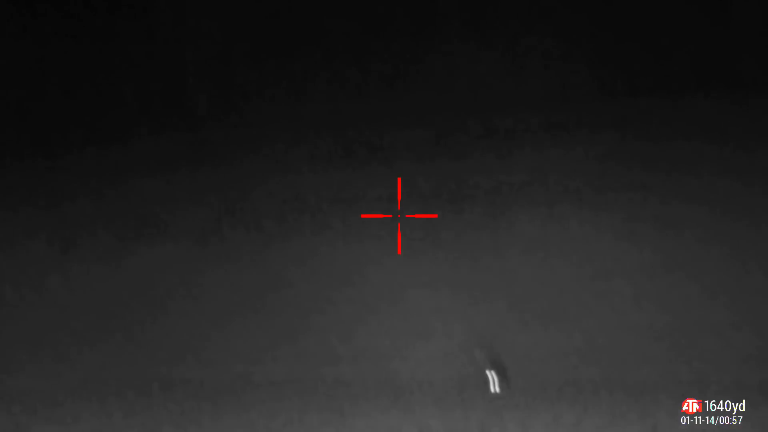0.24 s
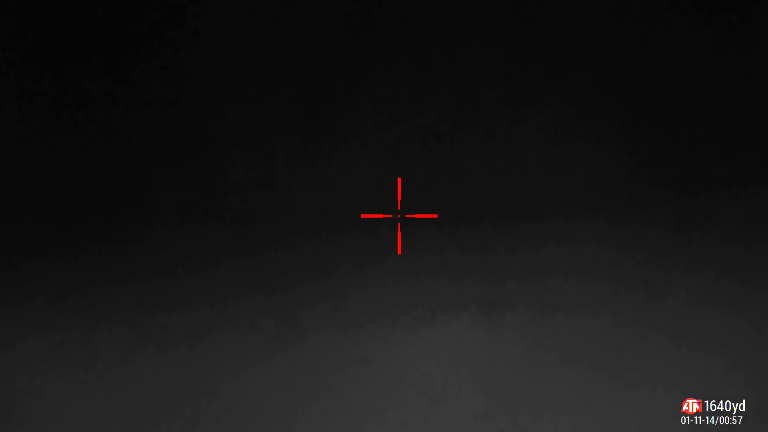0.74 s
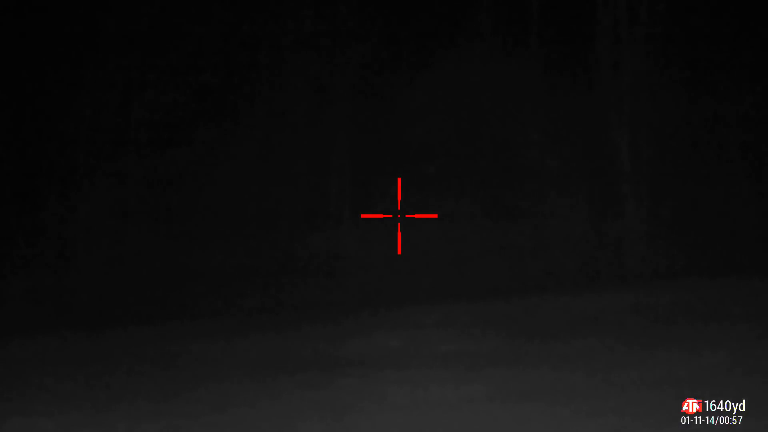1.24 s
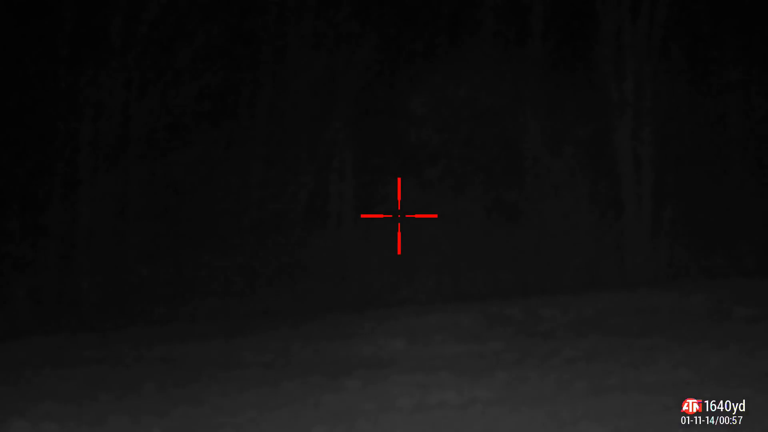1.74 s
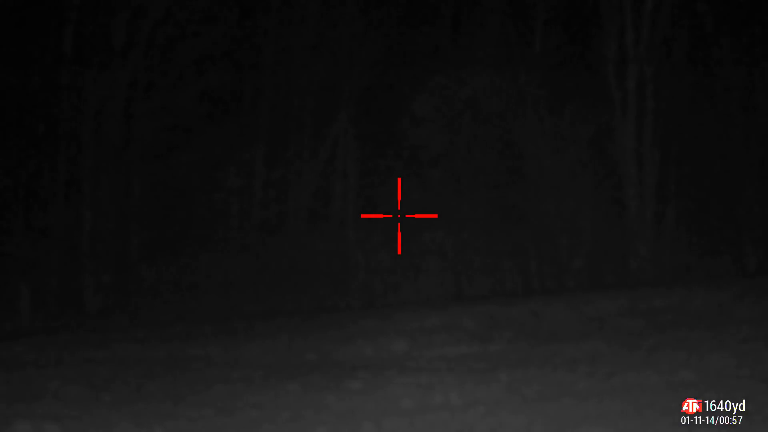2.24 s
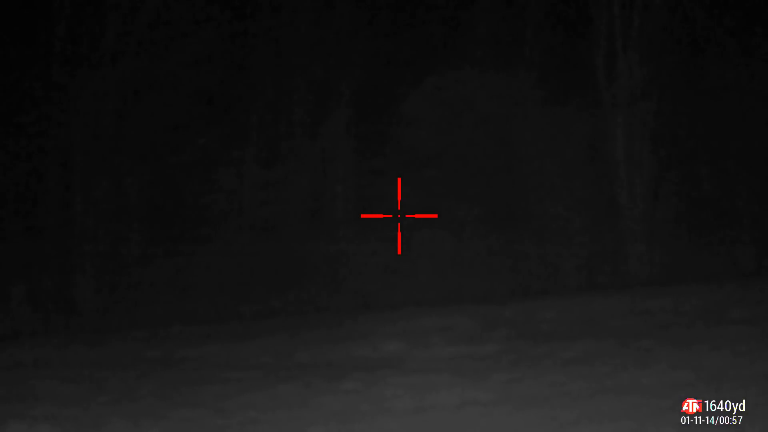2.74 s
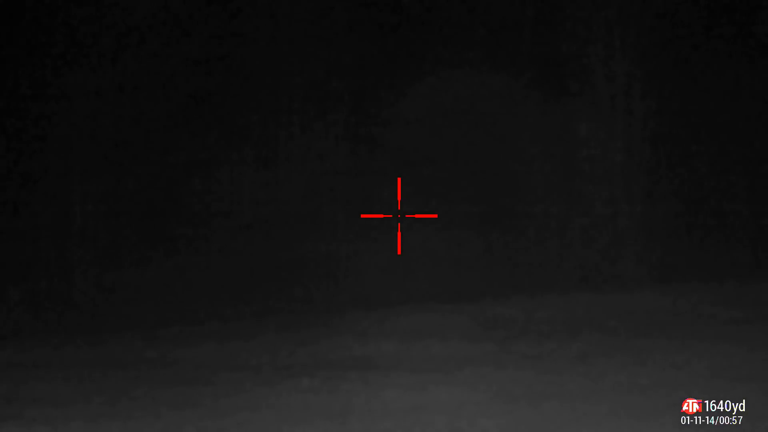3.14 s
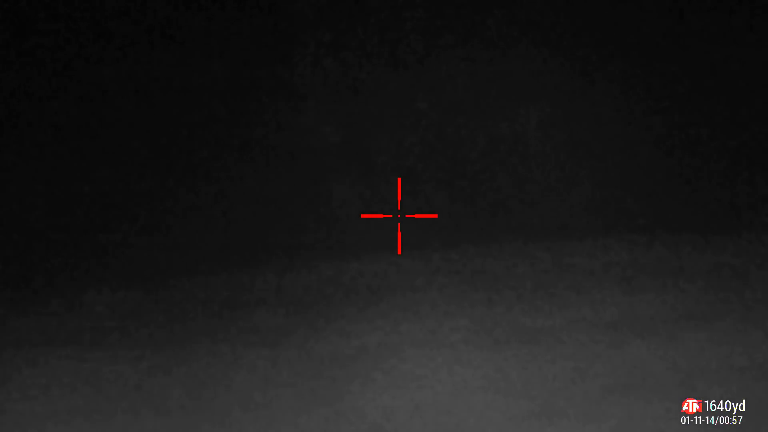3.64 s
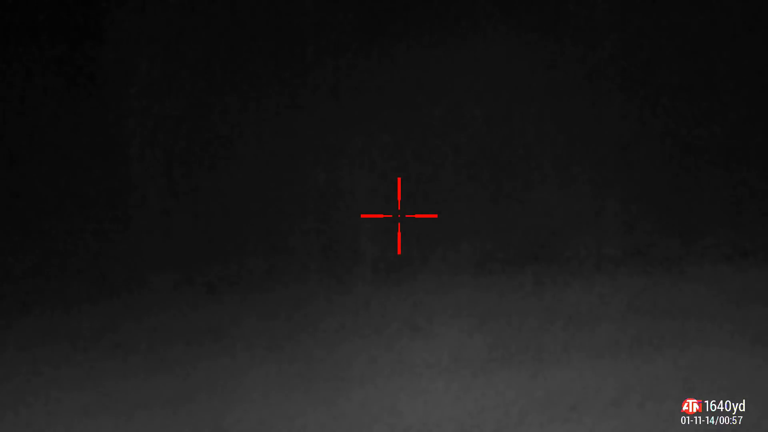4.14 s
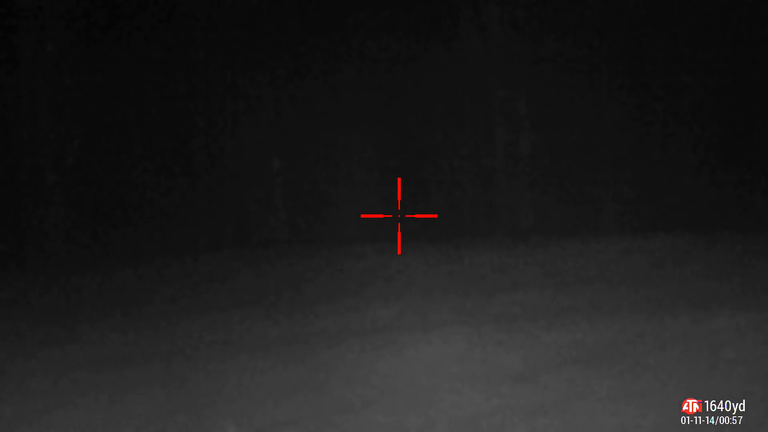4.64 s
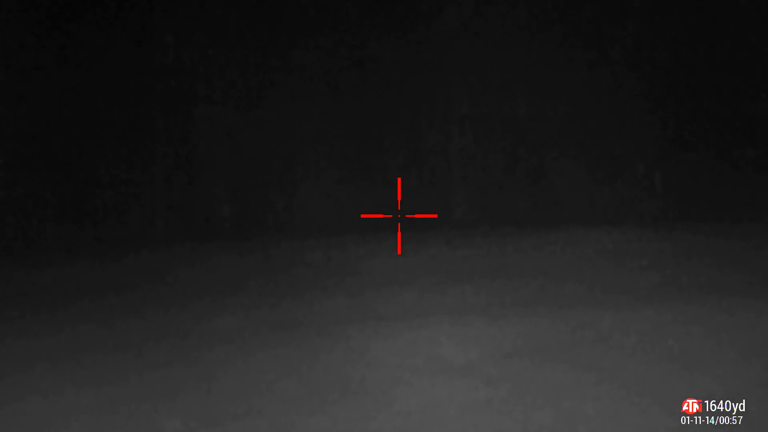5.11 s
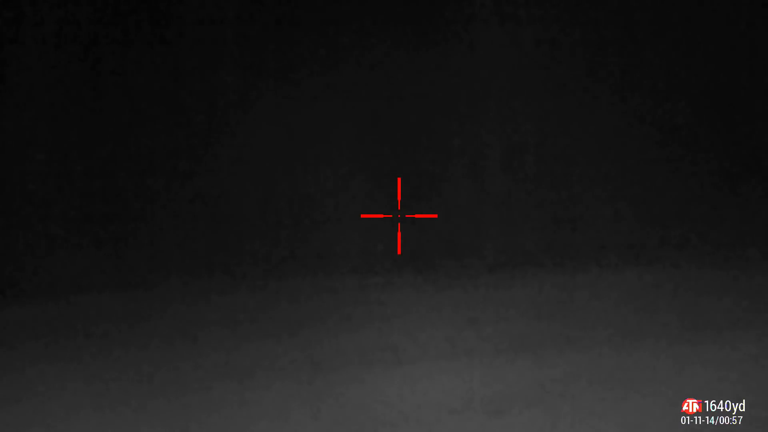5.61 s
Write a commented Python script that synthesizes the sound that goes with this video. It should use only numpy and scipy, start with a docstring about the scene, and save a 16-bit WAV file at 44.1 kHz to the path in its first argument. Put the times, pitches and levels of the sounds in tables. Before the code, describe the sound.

Quiet night air outdoors, with low soft noise, faint microphone hiss and a barely audible wavering whine throughout. A hand-squeezed reed call, close and much louder than everything else, starts immediately with a short nasal squeak. Ten more follow at about 0.4, 0.8, 1.3, 1.7, 2.1, 2.5, 3.3, 3.7, 4.4 and 4.9 seconds. Each lasts roughly a tenth to a fifth of a second, sliding up and back down around 1 to 1.6 kilohertz, bright and buzzy, the stronger ones flipping abruptly at the top. A close dull echo makes them flutter; a very faint tail returns from distant trees. Air hisses into the call around 0.15 seconds. Cloth swishes softly in uneven strokes throughout. Dull gear bumps fall near 1.5, 3.5, 4.0 and 4.8 seconds; tiny ticks come around 5.2, then a cluster of soft knocks at 5.3 to 5.6, before rustling fades into quiet air.

```python
"""Quiet night air, microphone hiss and a faint whine run throughout, as shaped noise and a wavering sine.
From the start a hand-squeezed reed call gives eleven mouse squeaks, harmonics gliding up and down with the squeeze.
A nearby wall throws every squeak back as a short dull echo, and a distant wood answers as a faint noise tail.
After the first squeak air hisses back into the call; then clothing rustles in strokes of shaped noise.
Later, as the scope is swung, the gear bumps (decaying sines with thuds) and ticks (short noise cracks)."""
import sys
import numpy as np
from scipy import signal
from scipy.fft import rfft, irfft, next_fast_len
from scipy.io import wavfile
from scipy.ndimage import uniform_filter1d, map_coordinates

SR = 44100
rng = np.random.default_rng(int(sys.argv[2]) if len(sys.argv) > 2 else 0)


def transcribe(signal):
    """Save signal, clipped to [-1, 1], as a 16-bit WAV file at the path in sys.argv[1]."""
    frames = np.atleast_2d(signal).T
    limited = np.clip(frames, -1, 1)
    pcm = np.round(limited * 32767).astype(np.int16)
    wavfile.write(sys.argv[1], SR, pcm)


N = 258867


def amp(db):
    """Decibels to gain."""
    return 10 ** (np.asarray(db) / 20)


def unit(x):
    """x at rms 1."""
    return x / np.sqrt(np.mean(x ** 2) + 1e-20)


def along(points, hz):
    """A curve of (frequency, value) points read on a log frequency axis."""
    point_hz, value = np.transpose(points)
    return np.interp(np.log(hz + 1), np.log(point_hz), value)


def wobble(rate, size):
    """A smooth random curve through normal random knots, rate knots a second."""
    knots = rng.standard_normal(int(size * rate / SR) + 4)
    return map_coordinates(knots, [np.arange(size) * rate / SR])


def filtered(x, response):
    """x times a complex response of frequency, padded so that tails do not wrap round."""
    size = 2 * next_fast_len(N // 2 + 8192)
    hz = np.fft.rfftfreq(size, 1 / SR)
    return irfft(rfft(x, size) * response(hz), size)[:N]


def resonate(x, points):
    """x through a body with this spectrum, ringing only after it is driven (minimum phase)."""
    def causal(hz):
        cepstrum = irfft(np.log(amp(along(points, hz))))
        half = len(cepstrum) // 2
        fold = np.r_[1, np.full(half - 1, 2), np.zeros(half)]
        return np.exp(rfft(cepstrum * fold))
    return filtered(x, causal)


def noise(points):
    """Coloured noise of rms 1."""
    white = rng.standard_normal(N)
    return unit(filtered(white, lambda hz: amp(along(points, hz))))


def reverb(x, decay, delay):
    """A diffuse tail, delay seconds late, in which each frequency dies at its own speed."""
    hz, t, grains = signal.stft(rng.standard_normal(SR), SR, nperseg=128)
    fade = amp(-60 * t / along(decay, hz)[:, None])
    tail = signal.istft(grains * fade, SR)[1]
    tail = tail / np.linalg.norm(tail)
    return signal.fftconvolve(x, np.pad(tail, (int(delay * SR), 0)))[:N]


# colour of the still air: freq_hz [Hz], relative_level_db [dB]
AIR_COLOUR = [(24, -69), (40, -33), (189, -10.5), (244, -7.5), (302, -4), (543, -1.5), (597, -0.5),
              (656, -2.5), (720, -3), (1070, -7), (1390, -9.5), (1840, -10.5), (4830, -15), (11000, -24.5),
              (14300, -55), (22000, -120)]
# colour of the microphone hiss: freq_hz [Hz], relative_level_db [dB]
HISS_COLOUR = [(8000, -13.5), (11000, -7.5), (12800, -4), (13700, 2), (14500, -8.5), (15400, -13.5)]


def night(air_db=-52, hiss_db=-64, whine_hz=719, whine_db=-66):
    """Still air as slowly swelling noise, steady microphone hiss, and a faint sine wavering in pitch."""
    whine_pitch = whine_hz + 4 * wobble(9, size=N)
    whine = np.sin(2 * np.pi * np.cumsum(whine_pitch) / SR)
    air = amp(air_db + 0.29 * wobble(4, size=N)) * noise(AIR_COLOUR)
    return air + amp(hiss_db) * noise(HISS_COLOUR) + amp(whine_db) * whine


STALL_HZ, LOWEST_HZ = 1028, 829  # the falling reed stalls here; the slack reed cannot swing slower than this
SCOOP_HZ_PER_S, SAG_HZ_PER_S = 45000, 21400  # it scoops up as it catches and sags once it has stalled
LOCK_HZ, LOCK_WIDTH_HZ = 1420, 40  # above this pitch the topped reed can lock to the barrel
SLIP_HZ, SLIP_AT_HZ, SLIP_WIDTH_HZ = 43.6, 1378, 24  # slip on leaving the lock: scale, centre, softness


def arch(t, rise, fall, start_hz, top_hz, jump_hz, bow, power):
    """Pitch follows the squeeze: it climbs, jumps to its top, then falls, slipping once if high, to a stall."""
    climb = np.clip(t / rise, 0, 1)
    drop = np.clip((t - rise) / fall, 0, 1)
    climbing = start_hz + (top_hz - jump_hz - start_hz) * (climb + bow * climb * (1 - climb))
    climbing = climbing + SCOOP_HZ_PER_S * np.minimum(t, 0)
    falling = top_hz - (top_hz - STALL_HZ) * drop ** power
    slipped = (top_hz > LOCK_HZ) * (1 - np.tanh((falling - SLIP_AT_HZ) / SLIP_WIDTH_HZ)) / 2
    # the slip closes up again towards the stall
    falling = falling - SLIP_HZ * slipped * (falling - STALL_HZ) / (SLIP_AT_HZ - STALL_HZ)
    falling = falling - SAG_HZ_PER_S * np.maximum(t - rise - fall, 0)
    return np.maximum(np.where(t < rise, climbing, falling), LOWEST_HZ)


ATTACK_S, RELEASE_S = 0.00053, 0.0033  # time constants of the catch and the stall
JITTER = .0024  # share by which the reed's pitch trembles before it slackens
RASP_GROWTH = 1.2  # how much more it trembles by the end of the fall, as it goes slack
KICK_DB, KICK_S = 1.5, 0.011  # the catching reed gives a small kick
SOFT_DB, SOFT_S, SLOW_RISE_S = 8.5, 0.025, 0.077  # the slower a squeeze beyond this rise, the weaker its start
SPENT_DB = 0.37  # level lost from start to end as the air runs out
OCTAVE_DB, STRAIN_DB = 3, 3.5  # the octave's gain in the lock, and its loss when high but not locked
FLIP_DB, FLIP_S = 4, .004  # the flip into the lock gives a short accent
LOCK_SAG_DB = 2  # a locked reed is a little quieter
PURE_S = 0.04  # time over which the overtones come back after the flip
# how the reed answers at each pitch: pitch_hz [Hz], level_db [dB], buzz_db_per_octave [dB per octave]
REED_ANSWER = [(1046, -7, -1.5), (1143, -4, -0.23), (1307, -0.5, 0.09), (1432, 0.5, 1.25),
               (1586, 5.5, -0.5)]


def squeak(t, rise, fall, start_hz, top_hz, jump_hz, bow, power, level_db, buzz_db, second_db, lock, pure_db,
           air_db=-12.5, flicker_db=0.5173):
    """One squeeze, t from its start: the reed's level and buzz follow its pitch as the pressure arches."""
    gate = np.exp(np.minimum(t, 0) / ATTACK_S - np.maximum(t - rise - fall, 0) / RELEASE_S)
    glide = arch(t, rise, fall, start_hz, top_hz, jump_hz, bow, power)
    slack = np.clip((t - rise) / fall, 0, 1) ** 2
    tremble = JITTER * (1 + RASP_GROWTH * slack) * wobble(900, size=len(t))
    pitch = glide * (1 + tremble)
    phase = 2 * np.pi * np.cumsum(pitch) / SR
    reed_hz, reed_db, reed_buzz_db = np.transpose(REED_ANSWER)

    # at the top of a hard squeeze the reed locks to the barrel: strong octave, altered overtones
    high = (1 + np.tanh((glide - LOCK_HZ) / LOCK_WIDTH_HZ)) / 2
    locked = np.clip(lock, 0, 1) * high * uniform_filter1d((t > rise) * 1., size=64)
    since_top = np.maximum(t - rise, 0)

    k = np.arange(1, 16)[:, None]  # harmonic number
    overtone_db = (buzz_db + np.interp(glide, reed_hz, reed_buzz_db)) * np.log2(k)
    overtone_db = overtone_db - locked * pure_db * np.exp(-(since_top / PURE_S) ** 2) * np.log2(k) * (k > 2)
    overtone_db = overtone_db + (second_db + OCTAVE_DB * locked - STRAIN_DB * (high - locked)) * (k == 2)
    # the higher the overtone, the less steady it is
    flicker = np.array([wobble(117.4, size=len(t)) for _ in k])
    overtone_db = overtone_db + flicker_db * (k - 1) * flicker
    reed = np.sum(amp(overtone_db) * np.cos(k * phase) * (k * pitch < SR / 2), axis=0)

    # a thin, high hiss of air escapes each time the reed opens
    thin_hiss = np.diff(rng.standard_normal(len(t) + 2), 2)
    air = amp(air_db) * thin_hiss * (1 + np.cos(phase))

    age = np.maximum(t, 0)
    kick_db = KICK_DB * np.exp(-age / KICK_S)
    soft_db = SOFT_DB * max(rise / SLOW_RISE_S - 1, 0) * np.exp(-(age / SOFT_S) ** 2)
    spent_db = SPENT_DB * (t / (rise + fall) - .5)
    lock_db = locked * (FLIP_DB * np.exp(-since_top / FLIP_S) - LOCK_SAG_DB)
    push_db = kick_db - soft_db - spent_db + lock_db
    return gate * amp(level_db + push_db + np.interp(glide, reed_hz, reed_db)) * (reed + air)


# one row per squeeze: start_s [s], rise_s [s], fall_s [s], start_hz [Hz], top_hz [Hz],
# jump_hz [Hz, at the top], bow [of the rise: + early, - late], power [of the fall: 1 straight, 3 lingering],
# level_db [dB], buzz_db_per_octave [dB per octave], second_harmonic_db [dB],
# lock [firmness at the top, 0-1], buzz_lost_in_lock_db_per_octave [dB per octave]
SQUEEZES = [(0.0003, 0.035, 0.068, 1330, 1519, 27.5, .82, 1.52, -1.75, -0.21, -1.5, 0.78, 0),
            (.38, .043, .089, 1197, 1612, 56.5, 0.14, 2.17, -1.36, -0.078, -2, 0.99, -1.3),
            (.7853, .044, 0.08, 1187, 1606, 30, 0.26, 1.82, -0.51, -.2, -2.5, 0.86, -0.5),
            (1.3351, .065, 0.068, 1121, 1380, -0.5, .74, 1.57, -0.052, -0.34, 2, 0, 2),
            (1.7191, 0.056, 0.076, 1154, 1555, 20.5, 0.49, 1.88, 0.32, 0.25, 1, 0.89, 2.2),
            (2.1169, 0.046, .093, 1164, 1605, 73, .52, 2.41, 0.77, .2, 0, 0.9, 3),
            (2.529, 0.053, 0.091, 1135, 1565, 0, -.28, 2.36, 0.52, .4, 0.5, 0.94, 3),
            (3.2793, .042, .065, 1130, 1291, -2, 1.13, 1.64, 0.54, 0.02, 2, 0, -3),
            (3.724, 0.078, 0.064, 1117, 1464, -0.5, 0.84, 1.45, 0.5, .2, 0, 0.052, 0),
            (4.3634, 0.12, 0.073, 1059, 1466, 37, -0.88, 3.5, 0.36, 0.078, 1.5, 0, 0),
            (4.9117, 0.055, 0.077, 1107, 1535, 15.5, -0.13, 2, -0.26, 0.17, 0, 0.74, 1)]
# resonances of the call's barrel: freq_hz [Hz], gain_db [dB]
BARREL_BODY = [(200, -53.5), (700, -13), (1080, -18), (1300, -19.5), (1600, -18.5), (2150, -22),
               (2750, -23), (3150, -18.5), (3520, -14.5), (3850, -24), (4350, -17), (5100, -33),
               (5750, -24), (6500, -35.5), (7500, -40), (8500, -43), (9300, -49), (11500, -53.5),
               (15000, -67)]


def call():
    """All the squeaks, sounding through the resonances of the barrel."""
    reed = np.zeros(N)
    margin = SR // 20  # room for the catch and the release
    for start, rise, fall, *manner in SQUEEZES:
        first = max(0, int(start * SR) - margin)
        n = np.arange(first, int((start + rise + fall) * SR) + margin)
        reed[n] += squeak(n / SR - start, rise, fall, *manner)
    return resonate(reed, BARREL_BODY)


# decay of the close surroundings: freq_hz [Hz], t60_s [s]
NEAR_DECAY = [(300, 0.15), (2000, 0.058), (12000, 0.018)]
# decay of the distant trees: freq_hz [Hz], t60_s [s]
WOOD_DECAY = [(300, .6), (1500, 0.56), (5000, .5), (12000, .2)]
# treble beams past the microphone and returns scattered: freq_hz [Hz], gain_db [dB]
SCATTER_COLOUR = [(1400, -19.5), (2600, -16.5), (6000, -7), (10000, -5)]


def surroundings(x, wall_ms=5.39, wall_db=-1.6, dull_hz=2100):
    """The near wall's dull echo cancels the gliding tone at regular pitches, so each squeak flutters."""
    def wall(hz):
        delay = np.exp(-2j * np.pi * hz * wall_ms / 1000)
        return delay / (1 + (hz / dull_hz) ** 2) ** .7
    echo = amp(wall_db) * filtered(x, wall)
    near = reverb(resonate(x, SCATTER_COLOUR), NEAR_DECAY, delay=.002)
    wood = amp(-54) * reverb(x, WOOD_DECAY, delay=0.092)
    return x + echo + near + wood


# air drawn back into the call: start_s [s], end_s [s], level_db [dB]
AIR_PUFFS = [(0.127, 0.179, -39.5)]
# colour of that air: freq_hz [Hz], relative_level_db [dB]
INTAKE_COLOUR = [(1500, -24.5), (2400, -11), (3300, -22), (4000, -8.5), (4500, 4.5), (5100, -12.5),
                 (6000, -22), (8000, -35), (15000, -40)]


def intake(edge=0.022):
    """The hand lets go and air hisses back into the call: coloured noise with edges ramped over edge seconds."""
    t = np.arange(N) / SR
    flow = np.zeros(N)
    for start, end, db in AIR_PUFFS:
        flow += amp(db) * np.clip(np.minimum(t - start, end - t) / edge + .5, 0, 1)
    return flow * noise(INTAKE_COLOUR)


# strokes of moving cloth: peak_s [s], rise_s [s], fall_s [s],
# swish_db, rub_db [dB, before the layer gains]
CLOTH_STROKES = [(.33, 0.066, 0.44, -44.5, -53.5), (.8, 0.12, 0.37, -45, -51.5),
                 (1.28, 0.14, .13, -63, -55), (1.95, 0.34, .25, -60.5, -66.5),
                 (2.78, .07, 0.14, -53, -62.5), (3.22, 0.19, 0.22, -51, -57),
                 (3.66, 0.2, 0.21, -48.5, -55.5), (3.988, 0.024, 0.016, -54, -48.5),
                 (4.32, 0.1, 0.41, -55.5, -58), (4.65, 0.057, 0.077, -62, -51.5),
                 (4.87, .06, 0.23, -53.5, -68), (5.37, 0.057, 0.09, -50.5, -55),
                 (5.5, 0.09, 0.21, -56.5, -56.5)]
# colour of the high swish: freq_hz [Hz], relative_level_db [dB]
SWISH_COLOUR = [(1500, -25.5), (2500, -14), (3400, -10), (4000, -2.5), (4450, 3.5), (5100, -10),
                (5900, -13.5), (7200, -20), (10000, -27), (15000, -40)]
# colour of the lower rub: freq_hz [Hz], relative_level_db [dB]
RUB_COLOUR = [(150, -28.5), (450, -0.5), (800, 2), (1300, -2.5), (2200, -4.5), (3500, -13), (8000, -37.5)]


def cloth(grain_db=1.5, swish_gain_db=.5, rub_gain_db=5):
    """Sleeves slide in strokes that swell and fade: a high swish over a lower rub, both uneven."""
    peak, rise, fall, swish_db, rub_db = np.transpose(CLOTH_STROKES)[:, :, None]
    t = np.arange(N) / SR - peak
    strokes = np.exp(-np.minimum((t / np.where(t < 0, rise, fall)) ** 2, 20))
    # overlapping strokes add in power
    swish_level = np.linalg.norm(amp(swish_db + swish_gain_db) * strokes, axis=0)
    rub_level = np.linalg.norm(amp(rub_db + rub_gain_db) * strokes, axis=0)
    grain = amp(grain_db * wobble(70, size=N))
    return grain * (swish_level * noise(SWISH_COLOUR) + rub_level * noise(RUB_COLOUR))


# soft bumps of the gear: start_s [s], level_db [dB, before make-up gain], pitch_hz [Hz]
GEAR_BUMPS = [(1.542, -36, 234), (3.485, -35, 169), (3.513, -40, 240), (3.984, -43, 287),
              (4.822, -44.5, 195), (5.284, -50, 129), (5.355, -40, 190), (5.458, -42, 160),
              (5.48, -32.5, 184), (5.498, -40, 200), (5.515, -32, 282), (5.55, -44, 149), (5.59, -44, 185)]
# colour of the bumps' thud: freq_hz [Hz], relative_level_db [dB]
THUD_COLOUR = [(30, -40), (70, -14), (130, 0.5), (280, -2), (450, -10.5), (1200, -53)]
# small clicks of the gear: start_s [s], level_db [dB, before make-up gain and shell]
GEAR_TICKS = [(5.15, -27), (5.168, -34), (5.219, -32)]
# hard shell the ticks ring in: freq_hz [Hz], gain_db [dB]
TICK_SHELL = [(150, -20), (450, 1.5), (1500, 1), (2500, -3.5), (4300, 3), (5200, -11), (6500, -8),
              (8000, -26), (15000, -37)]


def gear(bump_t60=0.041, bump_attack=0.0018, thud_db=-9, tick_t60=0.012):
    """Bumps are short dull thuds around a decaying sine; ticks are tiny noise cracks in a hard shell."""
    t = np.arange(SR // 8) / SR
    bumps, ticks = np.zeros(N), np.zeros(N)
    thud = noise(THUD_COLOUR)
    bump_shape = np.exp(-np.log(1000) * t / bump_t60) * (1 - np.exp(-t / bump_attack)) ** 2
    tick_shape = np.exp(-np.log(1000) * t / tick_t60)
    for start, db, hz in GEAR_BUMPS:
        n = int(start * SR) + np.arange(len(t))
        tone = np.sin(2 * np.pi * hz * t)
        bumps[n] += amp(db + 6.5) * bump_shape * (tone + amp(thud_db) * thud[n])  # 6.5 dB make-up
    for start, db in GEAR_TICKS:
        n = int(start * SR) + np.arange(len(t))
        ticks[n] += amp(db + 4) * tick_shape * rng.standard_normal(len(t))  # 4 dB make-up
    return bumps + resonate(ticks, TICK_SHELL)


def scene():
    """The night, the call in its surroundings, and its user, in one channel."""
    return (night() + surroundings(call()) + intake() + cloth() + gear())[None]


TOP_HZ = 15450  # band limit of the recorder


def record(dry):
    """The recorder keeps nothing above its band limit."""
    return filtered(dry[0], lambda hz: hz < TOP_HZ)[None]


dry = scene()
out = record(dry)
transcribe(out)
```